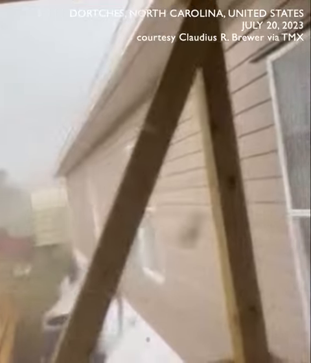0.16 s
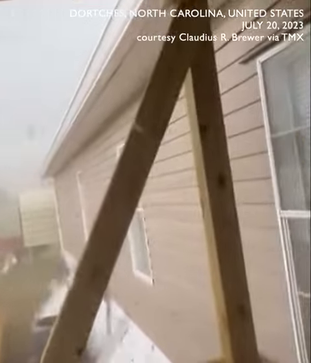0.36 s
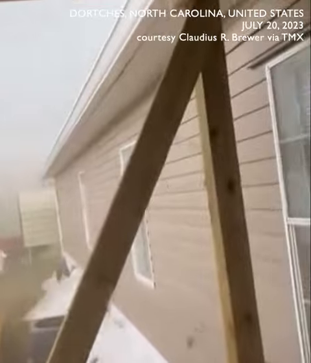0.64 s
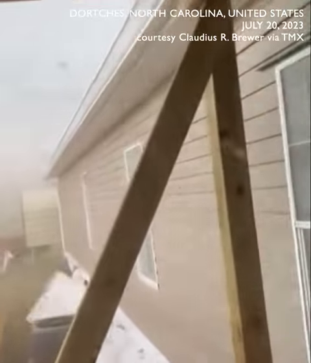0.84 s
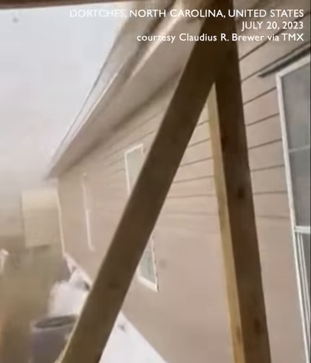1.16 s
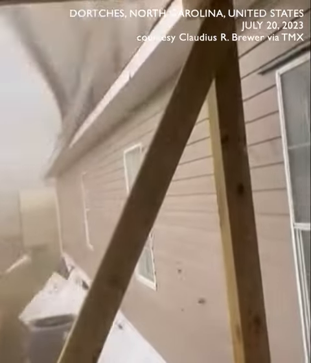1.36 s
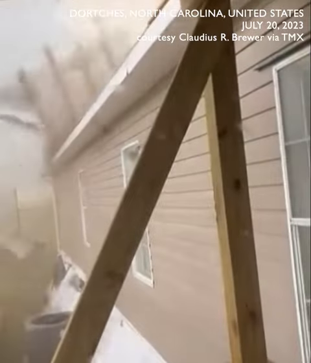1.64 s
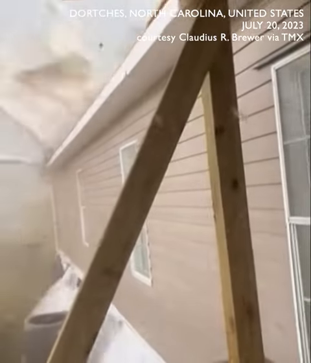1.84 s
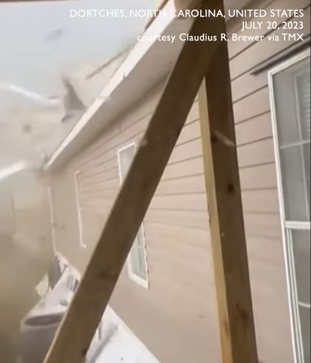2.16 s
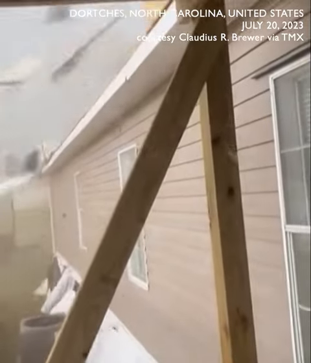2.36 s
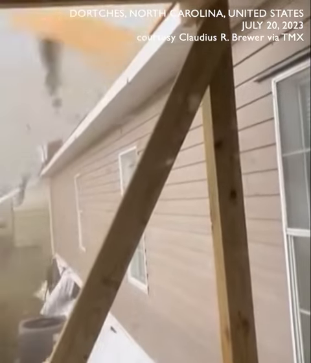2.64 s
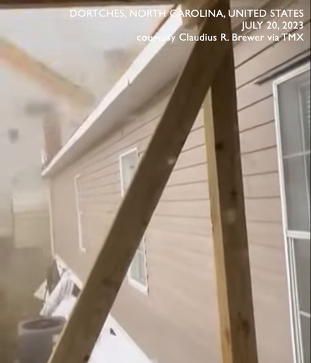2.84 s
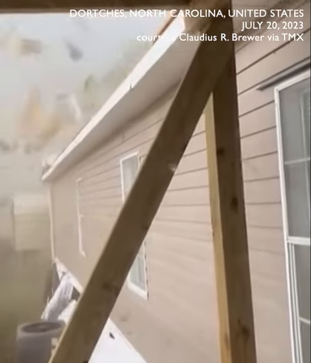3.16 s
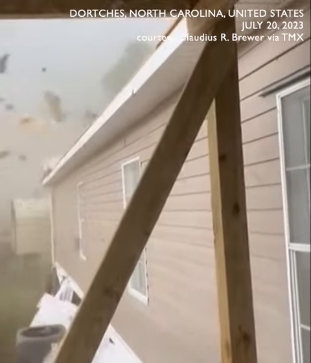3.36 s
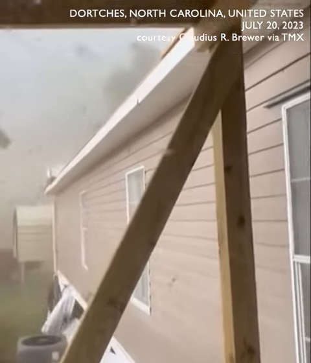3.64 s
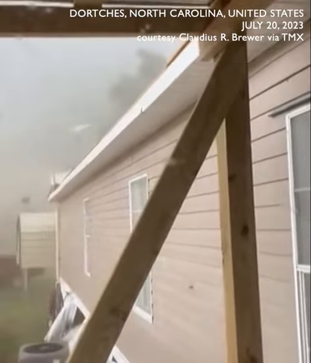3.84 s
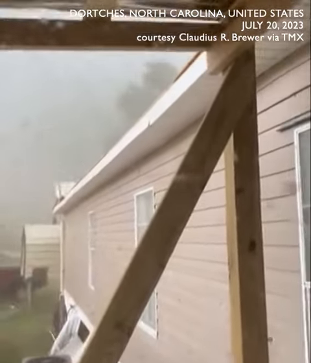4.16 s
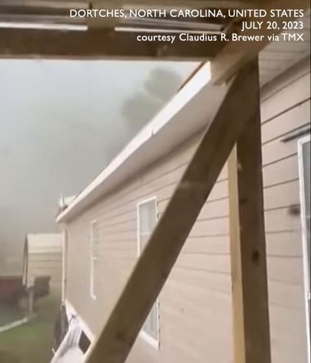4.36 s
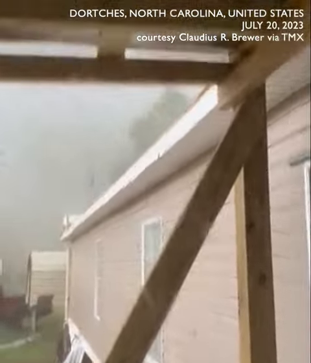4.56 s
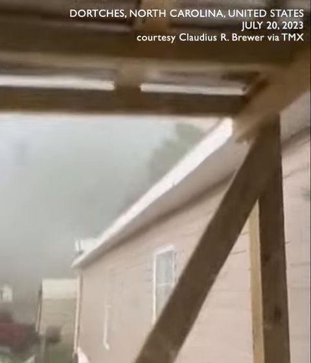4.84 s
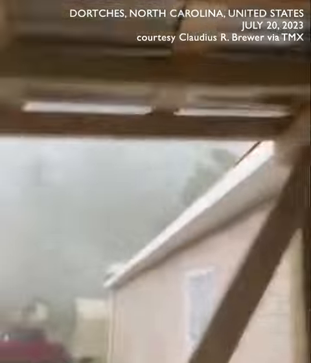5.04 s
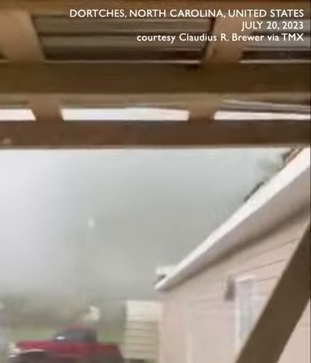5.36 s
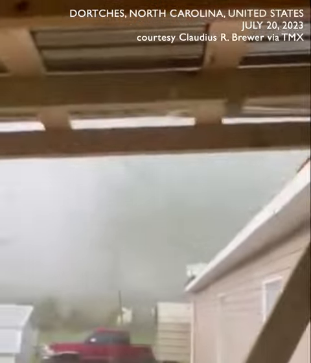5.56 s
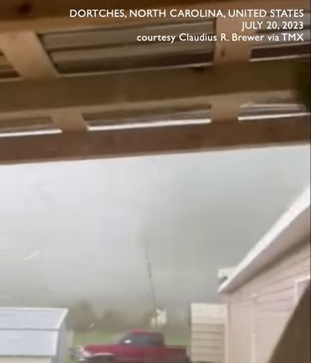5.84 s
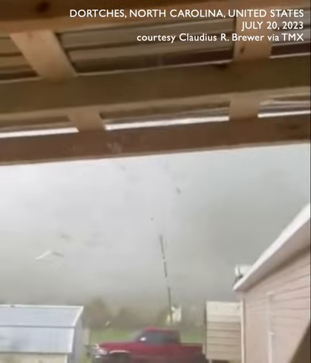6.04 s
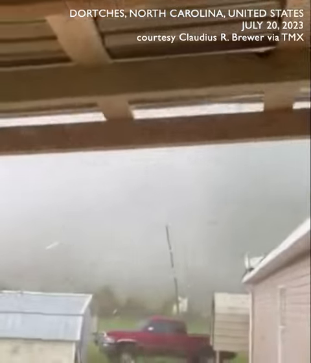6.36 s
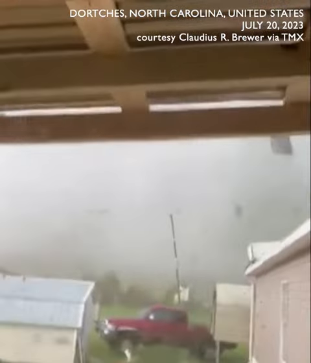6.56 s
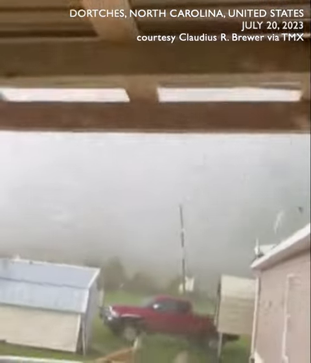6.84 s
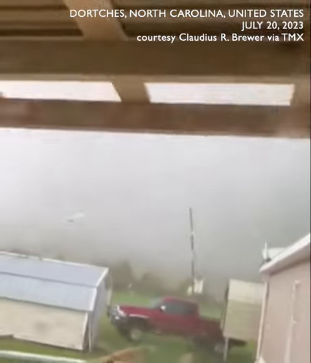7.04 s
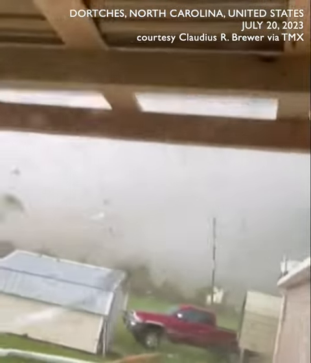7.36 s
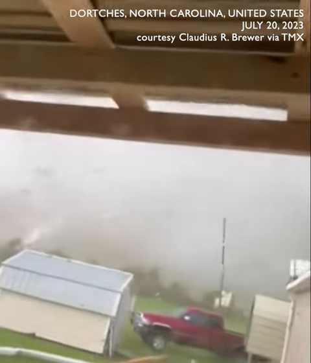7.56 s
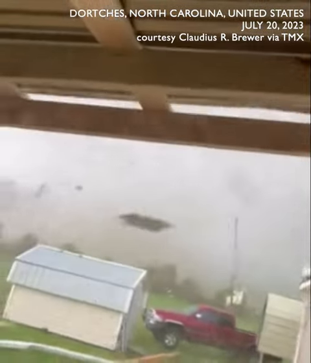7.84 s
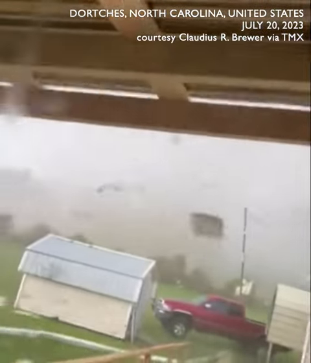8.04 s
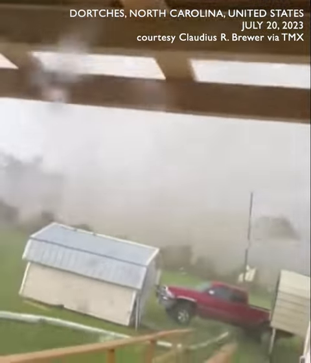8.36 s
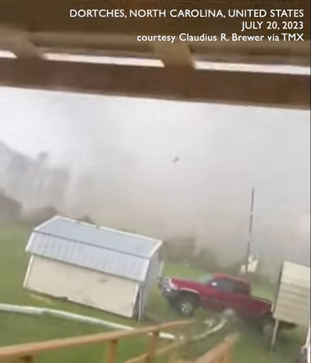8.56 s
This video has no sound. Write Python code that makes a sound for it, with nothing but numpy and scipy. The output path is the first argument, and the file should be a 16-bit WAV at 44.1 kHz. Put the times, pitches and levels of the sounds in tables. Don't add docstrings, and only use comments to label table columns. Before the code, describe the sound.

Outdoors under a wooden porch roof, a small crude microphone is battered by violent storm wind. From 0 s a gust swells quickly, strongest around 0.5 to 1 s: low bassy hum-like buffeting, uneven rumble, broad roar round the house and hissing grit, distorting at the peaks. A brittle crash hits near 0.5 s, deep deck thuds at 0.7 and 1.3 s, a heavy board at 1.7 s, more smacks to 2.7 s. From about 2.7 to 6.8 s the wind half sinks but keeps rumbling and fluttering, with lighter sheet rattles, splinter ticks, and thuds or knocks near 3.1, 4.5, 5.4, 5.6 and 6.5 s. A sharp crack comes at 6.8 s. The gust rises again by 7.5 s with board hits at 7.4 to 7.6 s, then a splintering cluster from 8.0 to 8.6 s, the sharpest crack near 8.3 s. It ends abruptly, still blowing hard.

```python
import sys
import numpy as np
from scipy import signal
from scipy.fft import rfft, irfft
from scipy.io import wavfile
from scipy.ndimage import uniform_filter1d, minimum_filter1d

SR = 44100
rng = np.random.default_rng(int(sys.argv[2]) if len(sys.argv) > 2 else 0)


def bounce(signal):
    frames = np.transpose(np.atleast_2d(signal))
    limited = np.clip(frames, -1, 1)
    pcm = np.round(limited * 32767).astype(np.int16)
    wavfile.write(sys.argv[1], SR, pcm)


def how_loud(loudness_db):
    steps = np.asarray(loudness_db, float) / 20
    return 10 ** steps


N = 383669
TIME_S = np.arange(N) / SR


# start_s, wind_db, grit_db (grit carried in the air)
GUSTS = [(0.0, -26.5, -42.5), (0.36, -20, -35), (0.53, -14.5, -34.5), (0.7, -18, -28), (0.99, -20, -31.5),
         (1.62, -17.5, -27.5), (2.69, -25.5, -36.5), (3.2, -27, -39), (3.78, -29.5, -39.5),
         (4.09, -28, -38.5), (4.63, -28, -42), (5.31, -26.5, -38), (5.89, -30, -40.5), (6.86, -26.5, -39.5),
         (7.49, -19, -34.5), (7.8, -22.5, -35.5), (8.29, -21, -37), (8.7, -19.5, -36)]
# middle_s, roar_lift_db, grit_lift_db, half_length_s
SURGES = [(.01, 4, 6.5, 0.025), (0.166, 3.5, 6.5, .03), (0.502, -1, 4.5, 0.057), (0.595, 3, 6, 0.017),
          (0.874, 5, 3, 0.051), (1.256, 3, 0.5, .05), (1.431, 1.5, 5, 0.041), (2.099, -4.5, -4.5, 0.04),
          (2.659, -2, -2.5, .06), (2.857, 3.5, -0.5, .04), (4.363, -2, -2, 0.027), (6.242, -1.5, 0, .06),
          (6.605, 3, 0, 0.035), (3.142, 1, 6.5, 0.036), (3.26, 2.5, 6, 0.065), (3.5, 2, 1.5, 0.026),
          (3.625, -3.5, -1.5, 0.033), (3.958, -6.5, 6, .025), (4.088, -1.5, 5.5, 0.016),
          (4.643, 2.5, 3.5, 0.022), (5.031, 0.5, 3, .03), (5.548, 2, -2.5, 0.045), (5.934, 5.5, -1, 0.033),
          (6.394, 0, 2, 0.068), (6.49, 2, -3, .03), (7.15, 3, -0.5, .07), (7.954, 0.5, -4, 0.046),
          (8.11, -2.5, 4.5, 0.037), (8.267, 3, -0.5, 0.12), (8.33, 0.5, -2.5, 0.024)]


def wind():
    wind_db, grit_db = in_time(GUSTS)
    wind_db, grit_db = wind_db + 24, grit_db + 37
    roar_push_db, grit_push_db = 0, 0
    for middle_s, roar_lift_db, grit_lift_db, half_s in SURGES:
        surge = swell(middle_s, half_s)
        roar_push_db = roar_push_db + roar_lift_db * surge
        grit_push_db = grit_push_db + grit_lift_db * surge
    slap, eddies, flutter = slaps(), drift(7.2), drift(62)
    buffet_level = np.hypot(how_loud(-23.5 + 0.55 * wind_db), slap)
    rumble_level = how_loud(-21.5 + wind_db) + how_loud(-12.5) * slap
    roar_level = how_loud(-25.5 + 0.93 * wind_db + 0.14 * grit_db + roar_push_db)
    grit_level = how_loud(-35 + 0.93 * grit_db + grit_push_db)
    return (buffet_level * buffet(eddies) + rumble_level * rumble(eddies, flutter)
            + roar_level * roar(eddies, flutter) + grit_level * grit(eddies, flutter))


# middle_s, level_db
SLAPS = [(.04, -15), (.21, -12), (.44, -7), (.66, -6), (0.803, -7.5), (1.312, -14), (1.581, -17.5),
         (1.872, -26.5), (1.049, -21), (2.56, -20.5), (3.058, -23.5), (3.37, -17.5), (3.89, -24.5),
         (4.22, -19.5), (4.48, -16.5), (4.81, -26), (7.29, -18), (5.28, -20), (5.602, -18), (5.782, -18.5),
         (6.04, -14), (6.55, -15), (6.72, -15.5), (6.9, -15.5), (7.09, -18), (7.469, -13.5), (7.769, -16),
         (8.11, -18.5), (8.43, -16), (8.62, -22)]


def slaps():
    power = sum((how_loud(level_db - 1) * swell(middle_s, 0.076)) ** 2 for middle_s, level_db in SLAPS)
    return np.sqrt(power)


# pitch_hz, level_db (per Hz)
AIR_TONE = [(15, -35), (25, -2), (60, -6), (108, -4.5), (217, -12.5), (455, -14), (596, -18), (2150, -26.5)]


def buffet(eddies):
    port_hz, port_width_hz = 51.3, 11
    hum = ring(rng.standard_normal(N), port_hz, np.log(1000) / np.pi / port_width_hz)
    push = turbulence(AIR_TONE, 26.1, 81.8, 0.33 * eddies, 0.14, 2.0)
    sound = rms_one(1.4 * rms_one(band(hum, 48.5, 100)) + push)
    return sound / np.sqrt(uniform_filter1d(sound ** 2, size=SR // 12) + 0.083)


# middle_s, lift_db
HEAVES = [(.05, 1), (.45, 3), (.97, 2.5), (1.46, -3.5), (1.85, -0.5), (2.0, -1), (2.22, 4), (2.6, -4),
          (2.9, 1.5), (3.33, -6.5), (3.55, 6), (3.8, -0.5), (4.2, 1.5), (4.38, -5.5), (4.66, 2), (5.3, 2),
          (5.8, -3.5), (5.93, 5), (6.08, -3.5), (6.28, 3.5), (6.45, -0.5), (6.85, 1.5), (7.07, -1),
          (7.45, 1.5), (7.63, 1.5), (7.8, -1), (8.48, -3.5), (8.58, 3), (8.69, -6.5)]


def rumble(eddies, flutter):
    heave_db = sum(lift_db * swell(middle_s, 0.038) for middle_s, lift_db in HEAVES)
    return turbulence(AIR_TONE, 84.2, 313.3, 0.5 * eddies + 0.5 * flutter + heave_db, 2.02, 8)


def roar(eddies, flutter):
    return turbulence(AIR_TONE, 311.7, 2336, 0.6 * eddies + 0.74 * flutter, 1.53, 11.5)


# pitch_hz, level_db (per Hz)
GRIT_TONE = [(2200, 0), (5000, -7.5), (7200, -13), (9500, -11.5), (12500, -40), (15200, 11)]


def grit(eddies, flutter):
    return turbulence(GRIT_TONE, 2257, 15030, 0.55 * eddies + 0.7 * flutter, 1.23, 44)


# start_s, peak_db, weight_db, dying_time_s (to fall 60 dB)
BOARDS = [(0.656, -27, 25, 0.1), (1.169, -14.5, 10, .34), (1.73, -7, 7, 0.32), (2.008, -13.5, 10, .2),
          (2.167, -17.5, 10.5, 0.36), (2.496, -16.5, 10, 0.11), (3.807, -19, 1, .25),
          (4.407, -23.5, 12.5, 0.39), (5.902, -21.5, -1, 0.59), (6.455, -22.5, -5, .28),
          (7.068, -17, -5, .25), (7.376, -8.5, 10.5, .15), (7.45, -12.5, 11, .3), (7.635, -10, -4, .25),
          (8.021, -17, 16, 0.15), (8.048, -9.5, -5, .18), (8.065, -19.5, 16, 0.29), (8.265, -16, 0, 0.15),
          (8.335, -11.5, -15, .3), (8.428, -12, 0.5, .22), (8.525, -12.5, -14, 0.29),
          (8.598, -12.5, -2, .2)]
# start_s, peak_db, brittleness_db, dying_time_s
SHEETS = [(0.13, -19, -11, 0.41), (0.213, -30.5, -18, 0.2), (0.47, -7, -13.5, 0.11),
          (0.858, -10, -13.5, .26), (2.657, -13, -16, 0.19), (2.928, -19.5, -22.5, 0.19),
          (3.079, -26.5, -13, 0.68), (3.385, -27.5, -23, 0.18), (3.934, -19, -8, .3), (4.068, -21, -4, .2),
          (4.191, -25.5, -14.5, 0.46), (4.638, -22, -18, 0.17), (5.001, -31, -4.5, 0.46),
          (5.197, -19.5, -12, 0.19), (5.315, -38, -15, 0.061), (5.463, -18, -16.5, .27),
          (5.539, -19.5, -31, 0.16), (6.803, -9, -13.5, 0.21), (7.739, -26, -19, 0.13),
          (8.091, -16, -11.5, 0.16), (8.357, -15, -19, 0.1)]
# start_s, peak_db, weight_db, brittleness_db
CRACKS = [(0.471, -10, 9, -17.5), (2.167, -14.5, 7, -24), (3.932, -26, 1, -10.5), (4.069, -27.5, -6, -10),
          (4.408, -18, 4, -24), (4.637, -20, -1, -21), (4.657, -23, -7.5, -19), (6.798, -15, 5.5, -16.5),
          (6.811, -10.5, 8, -20), (8.02, -10, -8, -23.5), (8.063, -15.5, 17.5, -22),
          (8.081, -15.5, 10, -21), (8.318, -0.5, -6, -26), (8.341, -10.5, -3.5, -23)]


def crashes():
    out = np.zeros(N)
    for start_s, peak_db, weight_db, t60 in BOARDS:
        hit = crash(peak_db, weight_db, -20 - 0.26 * weight_db, -24, t60)
        add_at(out, start_s, hit)
    for start_s, peak_db, brittle_db, t60 in SHEETS:
        hit = crash(peak_db, -2, brittle_db, 6 + 1.5 * brittle_db, t60)
        add_at(out, start_s, hit)
    for start_s, peak_db, weight_db, brittle_db in CRACKS:
        hit = crash(peak_db, weight_db, brittle_db, 3 + 1.05 * brittle_db, 0.035)
        add_at(out, start_s, hit)
    return out


# pitch_hz, level_db, dying_time_s
SIDING = [
    (488, -3, 0.074),
    (1092, 9.5, 0.025),
    (2020, -4, 0.061),
    (3330, -10, 0.024),
]


def crash(peak_db, dull_db, bright_db, fizz_db, t60):
    t = np.arange(SR // 2) / SR
    splinters = rng.standard_normal(len(t)) * how_loud(2.4 * rng.exponential(1, len(t)))
    rise, fall = 1 - np.exp(-t / (0.024 * t60)), how_loud(-60 * t / max(t60, 0.02))
    shower = rms_one(splinters) * rise * fall
    body = sum(how_loud(level_db - 38.5) * ring(shower, hz, decay_s) for hz, level_db, decay_s in SIDING)
    middle = how_loud(3.5) * band(shower, 550, 2500) + body
    dull = how_loud(dull_db + 8) * band(shower, 190, 630)
    bright = how_loud(bright_db + 6) * band(shower, 2500, 5000)
    fizz = how_loud(fizz_db - 1.5) * band(shower, 5500, 11500)
    short_lift_db = 7.0 * (t60 < 0.1)
    return how_loud(peak_db + short_lift_db) * (middle + dull + bright + fizz)


# start_s,
# peak_db, pitch_hz, dying_time_s (to fall 60 dB)
THUDS = [(0.698, 2.5, 92.3, 0.5), (0.781, -8, 126, 0.14), (1.277, 6.5, 152, 0.091),
         (1.567, -12, 136, 0.073), (2.346, -8.5, 141.5, 0.091), (3.084, -9, 96, 0.29),
         (4.477, -9, 120, 0.38), (5.361, -6, 115.7, 0.62), (5.889, -5, 144, 0.13), (6.518, -4, 117.6, 0.32),
         (7.393, -12, 101, 0.28), (7.608, -1.5, 101, 0.12), (8.063, -0.5, 182, 0.12),
         (5.601, 5, 109, 0.079), (6.162, -5.5, 135, 0.053), (8.078, -13, 171, 0.14),
          (8.079, -16, 151, 0.048), (8.063, -3, 380, 0.13), (8.074, -3, 282, .09), (8.082, -3, 310, 0.071),
          (8.32, -9.5, 800, 0.1), (8.342, -4.5, 810, .12), (.33, -3.5, 150, 0.18), (.8, -4.5, 150, .12),
          (3.09, -6.5, 155, .15), (3.5, -9, 170, .1), (7.615, -5, 180, .14), (2.02, -10, 200, .12),
          (1.34, -7, 95, .15), (.5, -7.5, 680, .12)]


def thuds():
    out, t = np.zeros(N), np.arange(SR // 2) / SR
    for start_s, peak_db, hz, t60 in THUDS:
        shape = (1 - np.exp(-t / 0.0063)) * how_loud(-60 * t / max(t60, 0.03))
        add_at(out, start_s, how_loud(peak_db - 1.0) * shape * np.sin(2 * np.pi * hz * t))
    return out


def turbulence(spectrum, low_hz, high_hz, eddies_db, own_db, rate):
    count = int(3 * np.log2(high_hz / low_hz))
    edges = np.geomspace(low_hz, high_hz, count + 1)
    points_hz, points_db = np.transpose(spectrum)
    white, out = rng.standard_normal((2, N)), 0
    for k, (low, high) in enumerate(zip(edges, edges[1:])):
        level_db = np.interp(np.log(low * high) / 2, np.log(points_hz), points_db)
        flicker_db = own_db * drift(rate)
        out = out + how_loud(level_db + flicker_db) * band(white[k % 2], low, high)
    return rms_one(out * how_loud(eddies_db))


def drift(rate):
    r = np.exp(-80 * np.pi * rate / SR)
    slow = signal.lfilter([1], [1, -2 * r, r * r], rng.standard_normal(N // 40 + 2002))[2000:]
    return np.interp(np.arange(N) / 40, np.arange(len(slow)), rms_one(slow))


def swell(middle_s, half_s):
    return np.exp(-0.5 * ((TIME_S - middle_s) / max(half_s, 0.01)) ** 2)


def ring(x, hz, t60):
    r, w = how_loud(-60 / (t60 * SR)), 2 * np.pi * hz / SR
    return signal.lfilter([0, np.sin(w)], [1, -2 * r * np.cos(w), r * r], x + 1e-18)


def band(x, low_hz, high_hz):
    return signal.sosfilt(signal.butter(2, [low_hz, high_hz], "band", fs=SR, output="sos"), x)


def rms_one(x):
    return x / np.sqrt(np.mean(x ** 2) + 1e-20)


def in_time(rows):
    start_s, *columns = np.transpose(rows)
    return [np.interp(TIME_S, start_s, column) for column in columns]


def add_at(out, start_s, sound):
    at = round(start_s * SR)
    out[at:at + len(sound)] += sound[:N - at]


def scene():
    return (wind() + crashes() + thuds())[None]


# low_hz, high_hz, depth_db
TREBLE_DIPS = [
    (5390, 6720, -12.5),
    (12900, 14450, -31),
]


def treble_dips(plain):
    hz, spectrum = np.arange(N // 2 + 1) * SR / N, rfft(plain)
    for low_hz, high_hz, depth_db in TREBLE_DIPS:
        inside = np.clip(np.minimum(hz - low_hz, high_hz - hz) / 250, 0, 1)
        spectrum = spectrum * how_loud(depth_db * inside)
    dipped = irfft(spectrum, N)
    hiss_power = uniform_filter1d(band(plain, 7140, 14000) ** 2, size=SR // 40) + 1e-12
    roar_power = uniform_filter1d(band(plain, 500, 2500) ** 2, size=SR // 40) + 1e-12
    hiss_db = 10 * np.log10(hiss_power / roar_power ** 0.8)
    brighter_db = hiss_db - uniform_filter1d(hiss_db, size=SR // 2)
    sudden = np.clip((brighter_db - 3.5) / 4.5, 0, 1)
    return dipped + 1.1 * sudden * (plain - dipped)


# pitch_hz, step_db (over the mean spectrum)
STEPS = [(300, -20), (2200, -5), (2750, 7.5), (3200, 8), (3700, 5), (4800, 5.5), (6200, 6.5), (7600, 5.5),
         (9600, 6), (10800, 9), (12000, 8), (14800, 8)]
# start_s, step_change_db
STEP_CHANGES = [(0, -.6), (.9, 1.2), (5.0, 1.2), (5.4, -1.6), (8.1, -1.6), (8.2, .3), (8.7, .3)]


def coarse_steps(x, plain):
    size, group, top_hz = 1024, 8, 15120
    k, n = np.arange(size) + 0.5, np.arange(2 * size) + 0.5
    window = np.sin(np.pi * n / 2 / size)
    basis = window[:, None] * np.cos(np.pi / size * np.outer(n + size / 2, k))
    count = N // size + 2
    at = np.arange(count)[:, None] * size + np.arange(2 * size)
    tones, shape = (np.pad(v, (size, 2 * size))[at] @ basis for v in (x, plain))
    hz = k * SR / 2 / size
    loud = minimum_filter1d(np.mean(shape[:, 120:450] ** 2, axis=1), size=7)
    mean = uniform_filter1d(np.median(shape ** 2 / loud[:, None], axis=0), size=25)
    wander = uniform_filter1d(rng.standard_normal((count, size // group)), size=5, axis=0)
    table_hz, table_db = np.transpose(STEPS)
    step_db = np.interp(np.log(hz), np.log(table_hz), table_db)
    step_db = step_db + 4.5 * np.repeat(wander, group, axis=1)
    change_db = np.interp(np.arange(count) * size / SR, *np.transpose(STEP_CHANGES))
    step = np.sqrt(loud[:, None] * mean) * how_loud(step_db + change_db[:, None])
    height = np.abs(tones) / step
    strong = np.sqrt(np.mean(height.reshape(count, -1, group) ** 2, axis=2)) > 0.45
    kept = np.sign(tones) * np.floor(height + 0.27) * step
    kept = kept * np.repeat(strong, group, axis=1) * (hz < top_hz)
    slices = kept @ basis.T * 2 / size
    return (slices[1:, :size] + slices[:-1, size:]).ravel()[:N]


def top_cut(x):
    return signal.sosfilt(signal.butter(12, 15240, fs=SR, output="sos"), x)


def record(dry):
    plain = signal.sosfilt(signal.butter(4, 40, "high", fs=SR, output="sos"), dry[0])
    x = coarse_steps(treble_dips(plain), plain)[None]
    knee = 5.4
    mix = x / (1 + np.abs(x) ** knee) ** (1 / knee)
    return top_cut(mix)


dry = scene()
out = record(dry)
bounce(out)
```